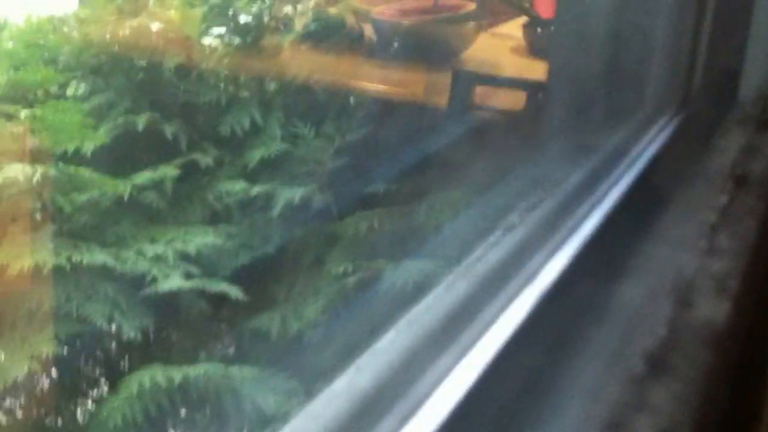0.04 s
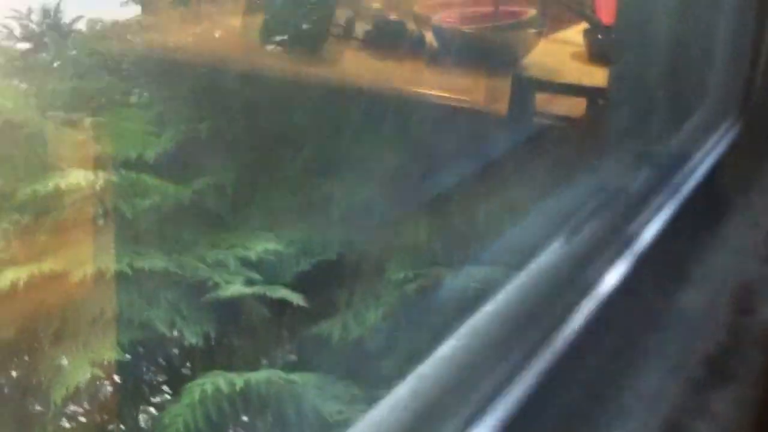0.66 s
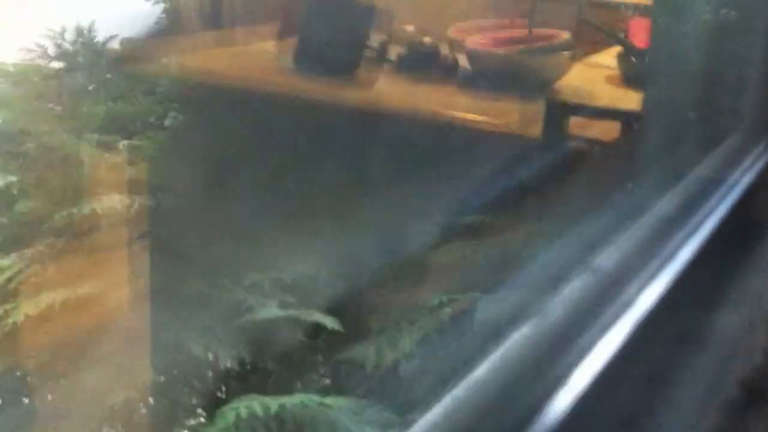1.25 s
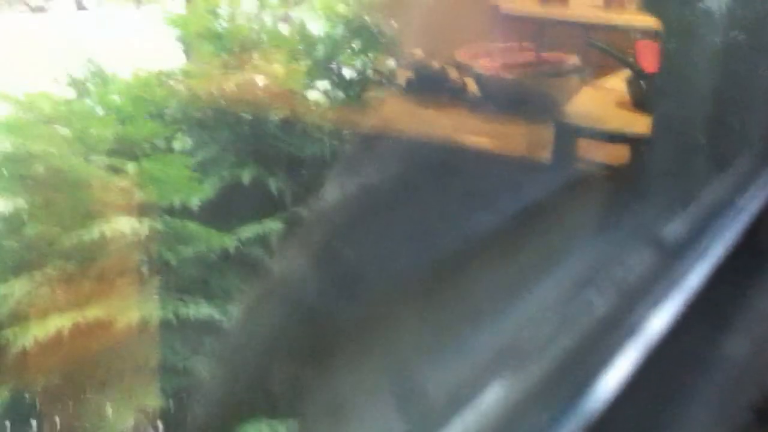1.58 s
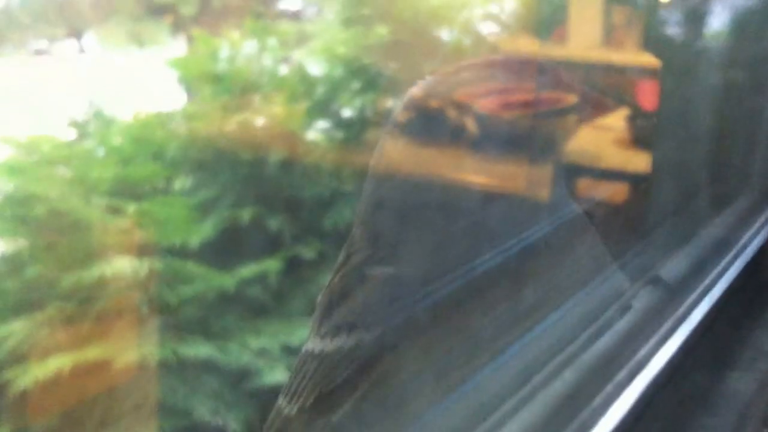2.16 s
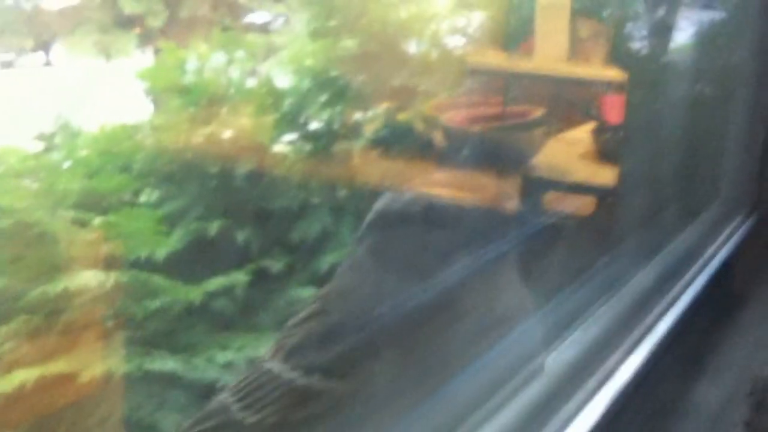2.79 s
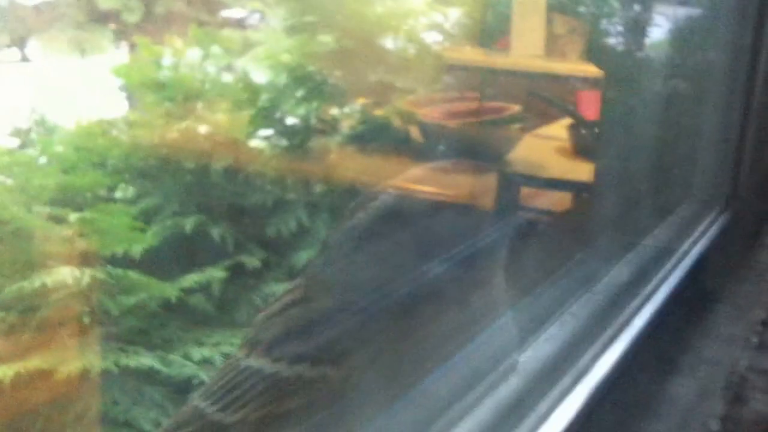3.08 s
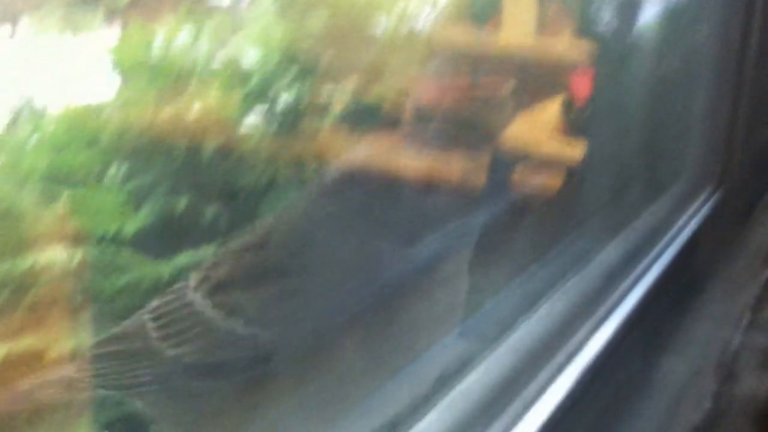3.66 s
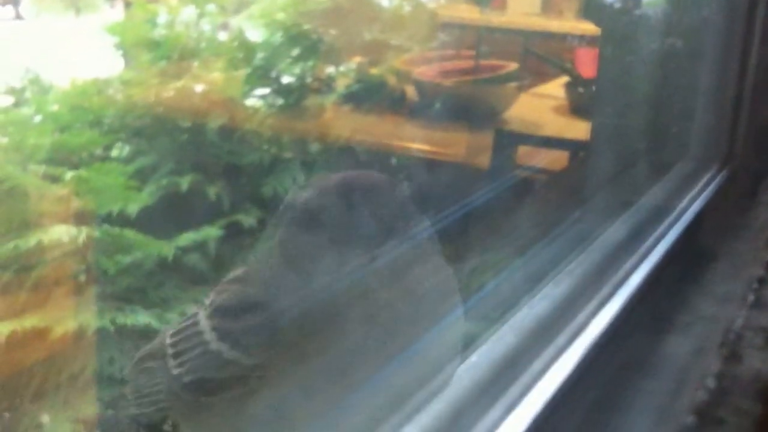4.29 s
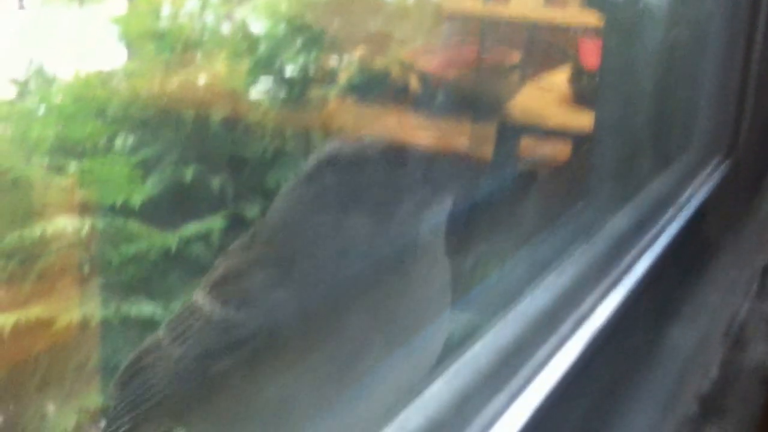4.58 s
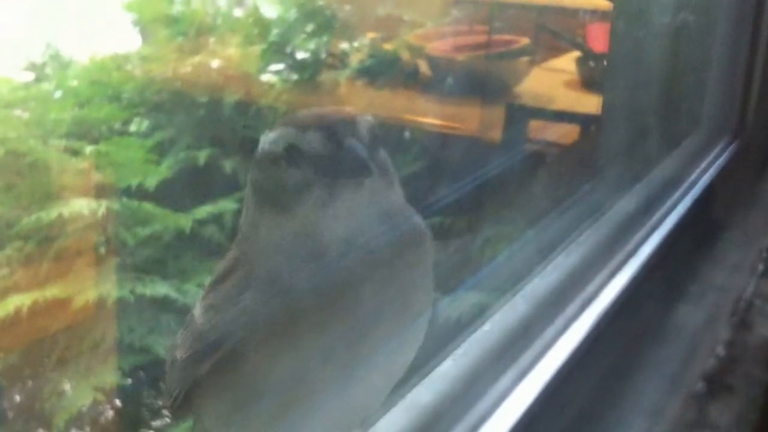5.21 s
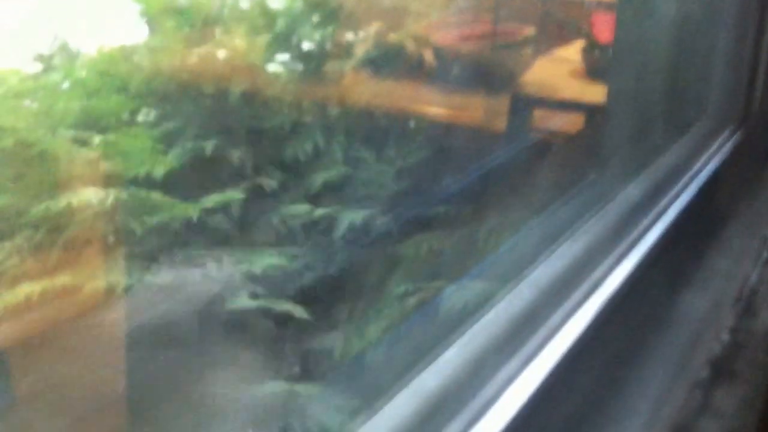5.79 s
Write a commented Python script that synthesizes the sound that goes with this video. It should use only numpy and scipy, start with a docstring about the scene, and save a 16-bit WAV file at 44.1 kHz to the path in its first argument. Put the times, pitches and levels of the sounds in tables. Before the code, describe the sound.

A low household hum and soft hiss run throughout, heard indoors beside a window. From about 0.2 seconds a sparrow's claws and beak tick lightly on the sill, busiest between 0.8 and 2 seconds. The bird pecks the glass three times, at about 1.4, 2.5 and 3.7 seconds, each a sharp crack with a short ring from the pane, the last the brightest. A few soft scrapes come from farther back in the house, the clearest at about 3 seconds. Faint ticks follow around 4.2 seconds. At about 5 seconds a door bumps shut with a louder cluster of thuds and a latch rattle, rebounding quickly in its frame and leaving a short room echo. Distant birds whistle very faint single notes now and then, ending with a few buzzy chirps and a couple of small sill ticks between 5.4 and 6 seconds.

```python
"""A sparrow pecks three times at a window pane, heard from indoors: each impact cracks sharply and
sets the bending modes of the glass ringing. In between, its claws and beak tick on the resonant sill.
Farther back in the house, friction makes a few scrapes; then a door bumps shut, rebounds in its frame
and leaves the room reverberating. Distant birds whistle a few frequency-modulated notes, and under
it all lie a low hum and hiss."""
import sys
import numpy as np
from scipy import signal
from scipy.fft import rfft, irfft
from scipy.io import wavfile

SR = 44100
rng = np.random.default_rng(int(sys.argv[2]) if len(sys.argv) > 2 else 0)


def log_audio(samples):
    """Write samples as a 16-bit WAV file to the path given in sys.argv[1]."""
    # one column per channel
    frames = np.atleast_2d(samples).T
    # limit to full scale, then quantise
    limited = np.clip(frames, -1, 1)
    pcm = np.round(limited * 32767).astype(np.int16)
    wavfile.write(sys.argv[1], SR, pcm)


N = 266805
T = np.arange(SR) / SR  # one second, the life of any single sound
HZ = np.fft.rfftfreq(SR, 1 / SR)

# bending modes of the pane: pitch_hz, level_db, base_t60_s
PANE_MODES = [(227.6, -11, 0.67), (271, -8, 0.65), (346.6, -11, 0.79), (380.5, 0, 0.22), (430, -1, 0.55),
              (507, 0.5, 0.34), (533, -2, 0.58), (585, -19.5, 1), (654, -7, 0.45), (727, 1.5, 0.28),
              (842, 1.5, 0.25), (878, -0.5, 0.22), (1016, 0.5, 0.26), (1088, 0, 0.1), (1199, -3.5, 0.3),
              (1237, -17, 0.39), (1330, -6, 0.24), (1394, -21, 0.22), (1480, -8.5, 0.26), (1564, 0.5, 0.11),
              (1630, -7.5, 0.26), (1747, -9, 0.33), (1803, 0, 0.072), (2060, -5, 0.13)]
# spectrum of the dense ring of frame and glass: frequency_hz, density_db
FRAME_SPECTRUM = [(40, -23), (100, -31), (160, 1.5), (280, 3.5), (520, 7), (900, -2.5), (1500, -2.5),
                  (2300, 0.5), (3200, -0.5), (5000, -13.5), (8000, -16), (16000, -37)]
# decay of that ring: frequency_hz, base_t60_s
FRAME_T60 = [(100, 0.22), (400, 0.3), (900, 0.34), (2000, 0.12), (4000, 0.082), (12000, 0.042)]
# spectrum of the crack of beak on glass: frequency_hz, density_db
CRACK_SPECTRUM = [(300, -16), (1500, -25), (2300, -2), (3200, 10.5), (3900, 2.5), (4480, 9), (5000, -5),
                  (6200, -8), (9000, -44), (16000, -55)]
# pecks on the pane: start_s, level_db, crack_db, decay_ratio, push_db, spot_hz, crack_hz
PECKS = [(1.4078, -27.5, 1, 1.66, -8, 573, 2450), (2.5010, -28, 5, 1.6, -2, 880, 5000),
         (3.6725, -32.5, 10, 1.32, -0.5, 970, 3750)]


def peck(level_db, crack_db, decay_ratio, push_db, spot_hz, crack_hz, push_hz=520, travel_s=.0027):
    """Impact excitation: the beak pushes the pane, bending waves crack at the frame, the modes ring."""
    hz, db, t60 = np.transpose(PANE_MODES)
    u = np.pi * push_hz * T - 2
    push = (2 * u ** 2 - 1) * np.exp(-u ** 2)  # one swing in and back, with no net flow of air
    spot_db = peaks_db([(spot_hz, spot_hz / 2, 5)])  # the struck spot favours some modes
    glass = ring(hz, db + np.interp(hz, HZ, spot_db), .75 * decay_ratio * t60)  # damped by the seal
    frame = die_away(noise(read(FRAME_SPECTRUM, HZ) + spot_db), FRAME_T60, decay_ratio)
    out = amp(push_db + 11) * push + (amp(-1) * glass + amp(-4) * frame) * rise(.00067)
    contact = amp(-11) * noise(read(CRACK_SPECTRUM, HZ) / 2) * fade(.0047)
    colour_db = read(CRACK_SPECTRUM, HZ) + peaks_db([(crack_hz, crack_hz / 4, 5)])
    crack = amp(4) * noise(colour_db) * fade(.026)
    dull_tail = amp(-14) * noise(colour_db - HZ / 600) * fade(.1)
    add(out, 0, amp(crack_db) * contact)
    add(out, travel_s, amp(crack_db) * (crack + dull_tail) * rise(.0038))
    return amp(level_db) * out


# resonances of sill and sash: centre_hz, width_hz, gain_db
SILL_RESONANCES = [(2060, 380, 2.5), (3930, 250, 6), (4140, 170, 0), (4750, 390, 2.5), (5920, 370, 5)]
# spectra of the sill's ring, the contact snap and the wooden knock: frequency_hz, density_db
SILL_SPECTRUM = [(100, -8), (1200, 3.5), (2100, 1.5), (6000, -1), (15000, -8)]
SNAP_SPECTRUM = [(500, -21), (4000, -1), (8000, -5), (15000, -2.5)]
KNOCK_SPECTRUM = [(60, -21), (200, -9), (650, -6), (1300, -12), (4000, -35)]
# light ticks of claws and beak: start_s, level_db, ring_hz, snap_db
TICKS = [(0.1979, -49, 3600, -23), (0.8205, -36.5, 2390, -16), (0.8979, -44, 1900, -8),
         (1.2045, -33, 2440, -6.5), (1.2372, -42.5, 4040, -3.5), (1.2685, -40.5, 2050, -21),
         (1.284, -40.5, 4250, 2), (1.3799, -46.5, 2570, -9), (1.461, -33, 4260, -12),
         (1.529, -40, 2270, 0.5), (1.5395, -39, 2400, -22), (1.6141, -45.5, 4040, 7),
         (1.888, -46.5, 5840, -19), (1.8991, -48.5, 4140, -1), (1.9712, -38.5, 4020, -2),
         (2.6184, -48, 4300, -6), (4.147, -53, 4800, -21), (4.2361, -46.5, 4020, -20),
         (4.2625, -48.5, 2020, -23), (5.5995, -48.5, 4280, -23), (5.8981, -44.5, 2570, -20)]


def tick(level_db, ring_hz, snap_db, slide_s=.01):
    """A light impact excites the sill's resonances; the briefer the contact, the brighter the tick."""
    band_db = -10 * np.log10(1 + np.log2((HZ + 1) / ring_hz) ** 4)  # an octave to either side
    ping_db = peaks_db([(ring_hz, ring_hz / 4, 8)])
    sill = noise(band_db + ping_db + peaks_db(SILL_RESONANCES) + read(SILL_SPECTRUM, HZ))
    snap = amp(snap_db + 4) * noise(read(SNAP_SPECTRUM, HZ))
    knock = amp(-13) * noise(read(KNOCK_SPECTRUM, HZ)) * fade(.044)
    tail = amp(-19) * fade(.1)
    sharpness = amp(max(snap_db + 5, 0) / 3)
    body = (amp(3) * sill * (fade(.017 / sharpness) + tail) + knock / sharpness) * rise(.0011)
    touch = amp(level_db) * (body + snap * (fade(.006) + tail / 2))
    out = touch.copy()
    for lag_s in slide_s * rng.random(size=3):  # the claw slides and catches again, more weakly
        add(out, lag_s, amp(-13) * touch)
    return out


# the sparrow shifts its feet: start_s, end_s, level_db, ring_hz
SHUFFLES = [(0.815, .89, -49.5, 2460), (1.326, 1.37, -53, 3400), (2.66, 2.81, -57, 3200),
            (5.64, 5.66, -50, 4400)]


def steps(gap_s=.031, jitter_s=.0036, spread_db=2, snap_db=-3):
    """A jittered impulse train: rows of faint ticks, uneven in time and strength, fill each shuffle."""
    rows = []
    for start_s, end_s, level_db, ring_hz in SHUFFLES:
        for step_s in np.arange(start_s, end_s, gap_s):
            late, weak = rng.standard_normal(2)
            rows.append((step_s + jitter_s * late, level_db - spread_db * weak, ring_hz, snap_db))
    return rows


# modes of the door leaf: pitch_hz, level_db
DOOR_MODES = [(134.6, -44), (290.7, -39), (333.8, -47), (408, -46), (527.6, -52.5), (565.2, -51),
              (667.5, -68), (699.8, -47.5), (888.2, -56), (1028, -42.5), (1071, -61), (1136, -48),
              (1211, -43.5), (1389, -64), (1540, -47), (1771, -51.5)]
# spectra of the leaf's thud and the latch's rattle: frequency_hz, density_db
THUD_SPECTRUM = [(25, -34), (60, -13.5), (130, -5.5), (280, 6), (450, -2.5), (700, -2), (1150, -6.5),
                 (1400, -13), (2000, -19), (4000, -55), (14000, -67)]
RATTLE_SPECTRUM = [(200, -6), (1000, 2.5), (2200, -4.5), (3200, -2), (4600, -5), (6500, -8.5), (10000, -16),
                   (15000, -30)]
# resonances and one notch of the latch: centre_hz, width_hz, gain_db
LATCH_RESONANCES = [(1510, 61, 5), (1760, 36, 6), (2200, 250, 1), (4690, 110, -10)]
# reverberation time of the rooms: frequency_hz, t60_s
ROOM_T60 = [(60, .6), (250, .55), (1000, .55), (4000, .63), (8000, .55), (15000, .42)]
# the latch rides over its plate, door meets frame, latch drops in: start_s, thud_db, rattle_db, spot_hz
DOOR_BLOWS = [(4.892, -60, -49, 2200), (4.942, -46, -46, 890), (4.968, -35, -33.5, 2200),
              (4.990, -21.5, -39.5, 288), (5.027, -21, -33.5, 630), (5.078, -26, -34.5, 4700)]


def door_blow(thud_db, rattle_db, spot_hz):
    """An impact rings the leaf's modes; thud and rattle arrive as direct sound, then reverberation."""
    hz, db = np.transpose(DOOR_MODES)
    spot_db = peaks_db([(spot_hz, spot_hz / 3, 7)])
    latch_db = peaks_db(LATCH_RESONANCES + [(spot_hz, spot_hz / 4, 11)])
    thud = amp(thud_db) * noise(read(THUD_SPECTRUM, HZ) + spot_db)
    rattle = amp(rattle_db) * noise(read(RATTLE_SPECTRUM, HZ) + latch_db)
    direct = amp(-3) * fade(.047)
    reverberant = amp(-1) * rise(.0083)
    blow = die_away(thud + rattle, ROOM_T60) * (direct + reverberant)
    leaf_t60 = .45 * (hz.mean() / hz) ** .17  # low modes last longer
    leaf = amp(thud_db - 6) * ring(hz, db + np.interp(hz, HZ, spot_db), leaf_t60)
    return (blow + leaf) * rise(.0015)


def rebounds(start_s=5.146, gap_s=.062, gap_ratio=.6, thud_db=-29, rattle_db=-58, loss_db=7.5):
    """Inelastic collisions: rows of blows as the latched door settles, each sooner and weaker."""
    rows, spot_hz = [], 132
    for k in range(3):
        rows.append((start_s, thud_db - k * loss_db, rattle_db - k * loss_db, spot_hz))
        start_s += gap_s * gap_ratio ** k
    return rows


# spectrum of the friction noise: frequency_hz, density_db
SCRAPE_SPECTRUM = [(60, -30), (200, -4), (550, -3), (780, 4), (1050, 1.5), (1350, -5), (1900, -6),
                   (2200, -11), (2600, -9.5), (4500, -11.5), (8000, -17.5), (12500, -25), (16000, -40)]
# scrapes farther back in the house: start_s, length_s, level_db, tilt_db_per_octave
SCRAPES = [(.365, 0.01, -57, 13.5), (.48, 0.015, -61.5, 3), (1.855, 0.0082, -62, 3),
           (2.39, 0.038, -48.5, -4.5), (3.04, 0.059, -39.5, 1.5), (4.57, 0.0079, -57, 0.5)]


def scrape(length_s, level_db, tilt_db_per_octave, decay_ratio=1.156):
    """Friction noise builds up while the stroke lasts, then decays as reverberation."""
    octaves = np.log2(np.clip(HZ, 250, 9000) / 1000)
    friction = noise(read(SCRAPE_SPECTRUM, HZ) + tilt_db_per_octave * octaves)
    swell = np.minimum(T / length_s, 1)
    stroke_decay = fade(decay_ratio * read(ROOM_T60, 1000), length_s)  # at 1 kHz, by the stroke's end
    return amp(level_db) * die_away(friction, ROOM_T60, decay_ratio) * swell / stroke_decay


# notes of distant birds: start_s, length_s, start_hz, end_hz, level_db, warble_ratio
BIRD_NOTES = [(1.14, 0.046, 3530, 3700, -65, .04), (2.29, 0.073, 2960, 2730, -68, .13),
              (3.26, 0.029, 2300, 2100, -56.5, .08), (4.77, 0.063, 5370, 4330, -71.5, .015),
              (5.405, .085, 6020, 4200, -63, .02), (5.595, 0.064, 6200, 4380, -62.5, .12)]


def bird_note(length_s, start_hz, end_hz, level_db, warble_ratio, warble_hz=130):
    """Frequency modulation makes a gliding whistle buzz; reflections from the garden prolong it."""
    t = T[:int(length_s * SR)]
    glide_hz = end_hz + (start_hz - end_hz) * np.exp(-3 * t / length_s)
    warble = warble_ratio * (1 - .5 * t / length_s) * np.sin(2 * np.pi * warble_hz * t)
    phase = 2 * np.pi * np.cumsum(glide_hz * (1 + warble)) / SR
    whistle = unit_rms(np.sin(phase) * signal.windows.tukey(len(t), .5))
    echoes = rng.standard_normal(SR) * fade(.46)
    direct = .5 * (T == 0)
    path = direct + amp(-2) * echoes / np.linalg.norm(echoes)
    return amp(level_db) * signal.fftconvolve(whistle, path)


def chirps(start_s=5.705, period_s=.117, length_s=.0412, glide_hz=(4200, 4700), level_db=-62.5):
    """Periodic repetition: rows of three rising, buzzy notes that end one bird's phrase."""
    warble_ratio = .15
    return [(start_s + k * period_s, length_s, *glide_hz, level_db, warble_ratio) for k in range(3)]


# spectrum of house noise and hiss: frequency_hz, density_db
FLOOR_SPECTRUM = [(15, -70), (25, -29), (87, -26), (141, -8), (180, -16), (212, 0), (249, -10), (354, -5.5),
                  (384, -8.5), (887, -11.5), (962, -15), (1160, -14), (1650, -23.5), (14800, -31.5),
                  (16000, -31.5)]
# two narrow bands of household hum: centre_hz, width_hz, level_db
HUM_BANDS = [(212.3, 22, -69.5), (363.9, 7.3, -65.5)]


def background(floor_db=-59, waver_db=1):
    """Broadband noise, slowly amplitude-modulated in its low part, lies under narrowband hum."""
    hz = np.fft.rfftfreq(N, 1 / SR)
    waver = shaped_noise(1 / (1 + (hz / 4) ** 4), N)
    hum = sum(amp(db) * shaped_noise(resonance(hz, centre, width), N) for centre, width, db in HUM_BANDS)
    floor = amp(floor_db) * shaped_noise(amp(read(FLOOR_SPECTRUM, hz)), N)
    low = irfft(rfft(floor) / (1 + (hz / 1200) ** 4), N)
    return floor + (amp(waver_db * waver) - 1) * low + hum


def amp(db):
    """Decibels as an amplitude ratio."""
    return 10 ** (np.asarray(db) / 20)


def unit_rms(x):
    """Normalisation to unit power."""
    return x / np.sqrt(np.mean(x ** 2) + 1e-20)


def read(points, hz):
    """Linear interpolation on a log-frequency axis."""
    point_hz, value = np.transpose(points)
    return np.interp(np.log(hz + 1), np.log(point_hz + 1), value)


def resonance(hz, centre_hz, width_hz):
    """A Lorentzian peak of unit height."""
    return 1 / (1 + (2 * (hz - centre_hz) / width_hz) ** 2)


def peaks_db(resonances):
    """The summed gain of resonances at each of HZ."""
    return sum(db * resonance(HZ, centre, width) for centre, width, db in resonances)


def shaped_noise(gain, samples):
    """Spectral shaping of white noise, at unit power."""
    return unit_rms(irfft(rfft(rng.standard_normal(samples)) * gain, samples))


def noise(db):
    """One second of unit-power noise with the given relative level at each of HZ."""
    return shaped_noise(amp(db), SR)


def fade(t60, t=T):
    """Exponential decay by 60 dB in t60 seconds."""
    return np.exp(-np.log(1000) * t / np.maximum(t60, 1e-3))


def rise(time_constant_s):
    """Exponential approach to full amplitude."""
    return 1 - np.exp(-T / time_constant_s)


def die_away(x, t60s, decay_ratio=1):
    """Frequency-dependent damping: each band of x decays at its own rate."""
    hz, t, bands = signal.stft(x, SR, nperseg=256)
    decay = fade(decay_ratio * read(t60s, hz)[:, None], t)
    return signal.istft(bands * decay, SR, nperseg=256)[1][:SR]


def ring(hz, db, t60):
    """Modal synthesis: damped sines of random phase, starting at unit power."""
    hz, db, t60 = hz[:, None], db[:, None], t60[:, None]
    size = amp(db) / np.sqrt(np.sum(amp(db) ** 2) / 2)
    return np.sum(size * fade(t60) * np.sin(2 * np.pi * (hz * T + rng.random(hz.shape))), 0)


def add(mix, start_s, sound):
    """Superposes a delayed sound on the mix."""
    part = mix[max(round(start_s * SR), 0):][:len(sound)]
    part += sound[:len(part)]


def scene():
    """Linear superposition of every source, in one channel."""
    mix = background()
    for rows, source in ((PECKS, peck), (DOOR_BLOWS + rebounds(), door_blow), (SCRAPES, scrape),
                         (BIRD_NOTES + chirps(), bird_note), (TICKS + steps(), tick)):
        for start_s, *settings in rows:
            add(mix, start_s, source(*settings))
    return mix[None]


def record(dry, low_cut_hz=55, high_cut_hz=16100):
    """Band limiting: the small microphone loses the deep bass, a low-pass filter the highest treble."""
    thin = signal.sosfilt(signal.butter(2, low_cut_hz, "highpass", fs=SR, output="sos"), dry)
    low_pass = signal.firwin(511, high_cut_hz, window=("kaiser", 9), fs=SR)
    return signal.oaconvolve(thin, low_pass[None], "same")


dry = scene()
out = record(dry)
log_audio(out)
```